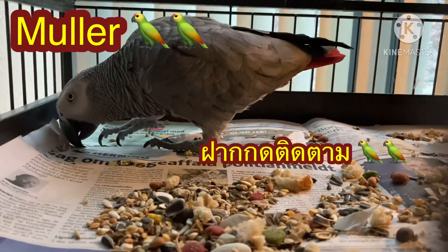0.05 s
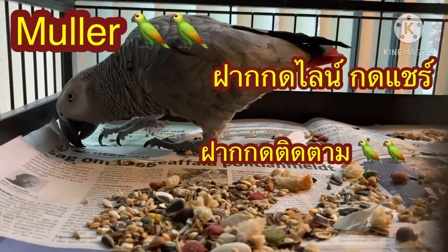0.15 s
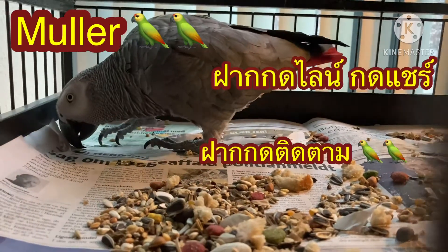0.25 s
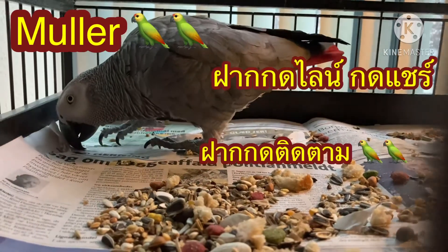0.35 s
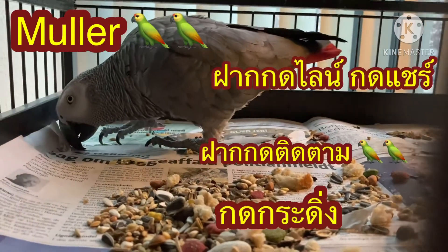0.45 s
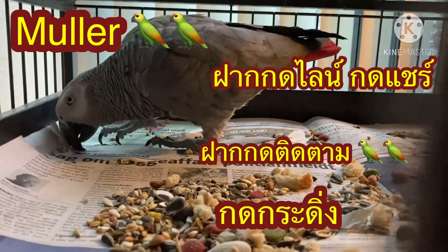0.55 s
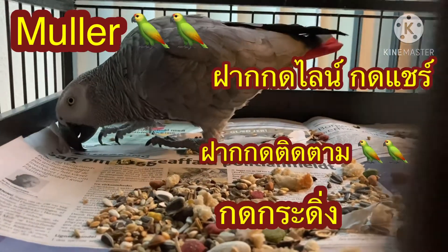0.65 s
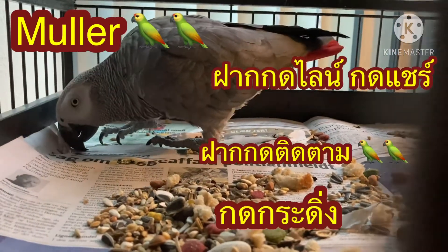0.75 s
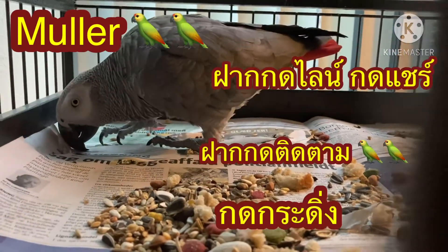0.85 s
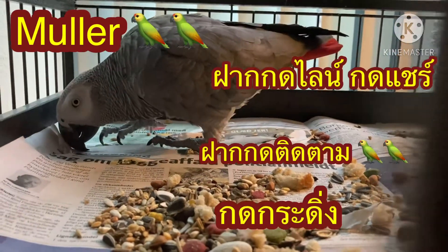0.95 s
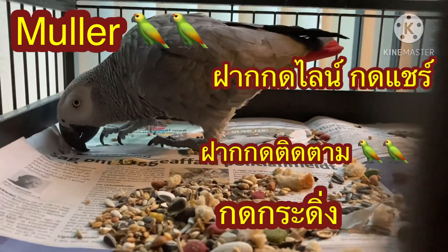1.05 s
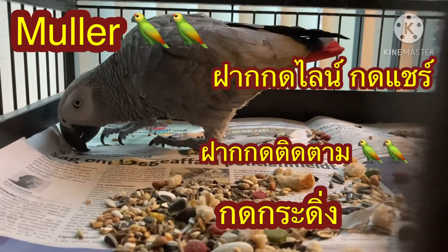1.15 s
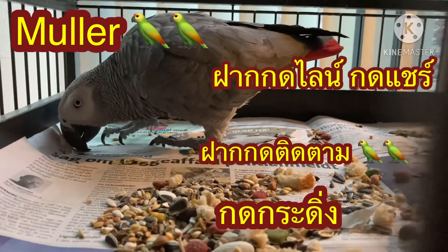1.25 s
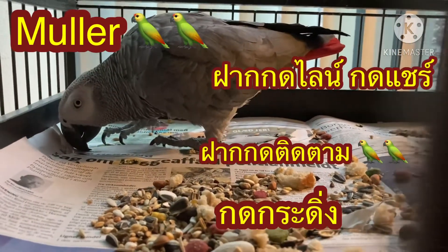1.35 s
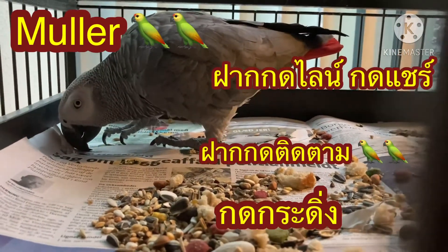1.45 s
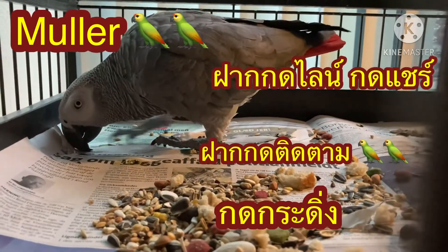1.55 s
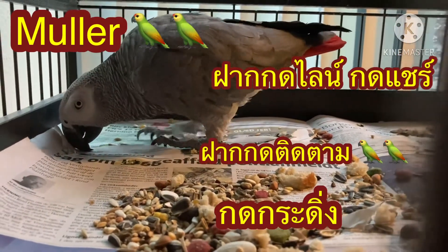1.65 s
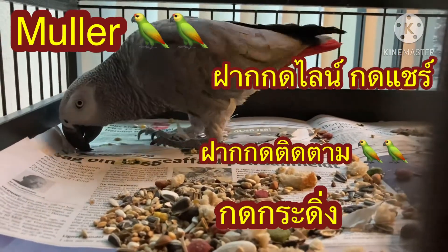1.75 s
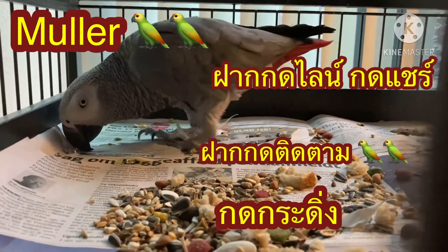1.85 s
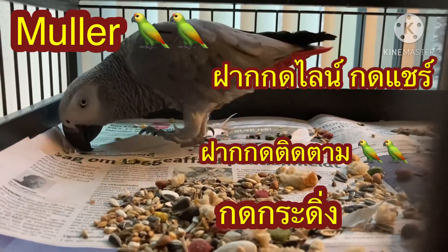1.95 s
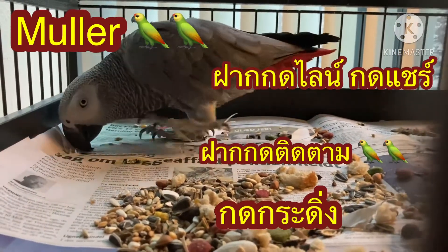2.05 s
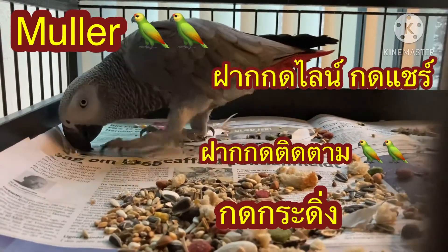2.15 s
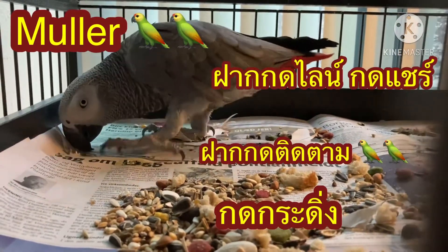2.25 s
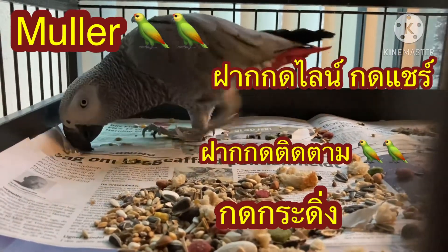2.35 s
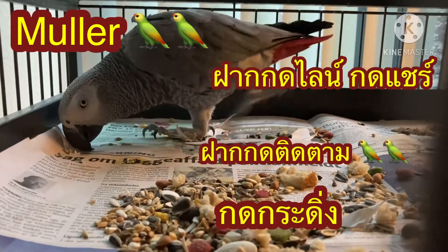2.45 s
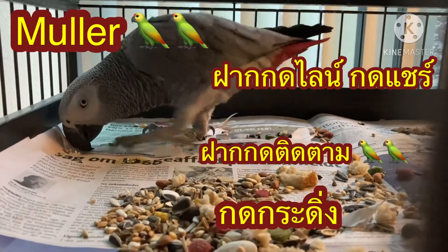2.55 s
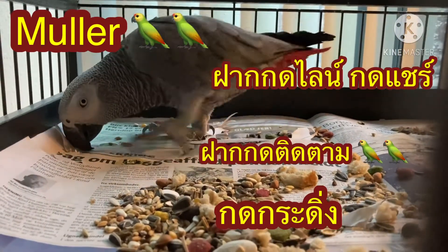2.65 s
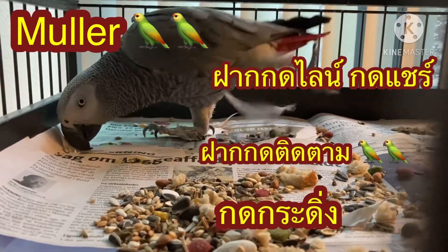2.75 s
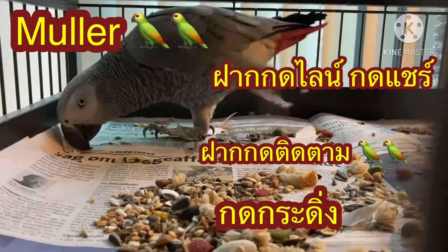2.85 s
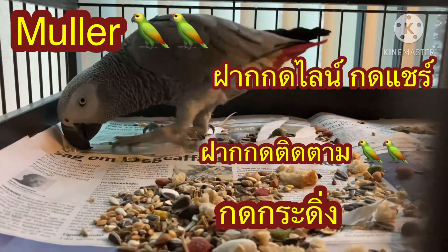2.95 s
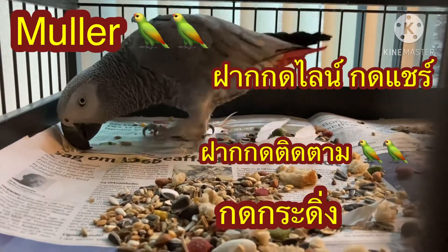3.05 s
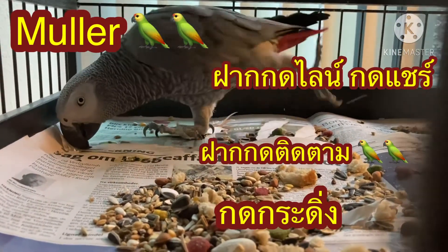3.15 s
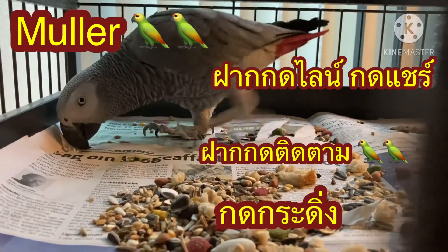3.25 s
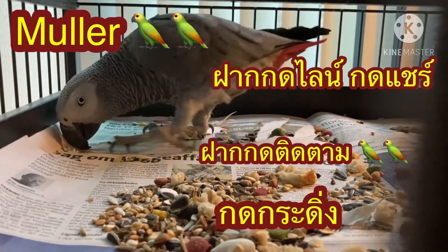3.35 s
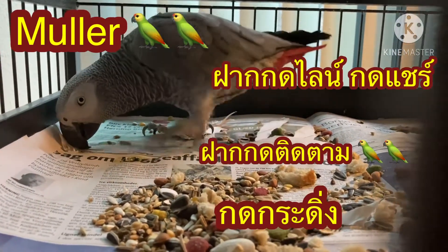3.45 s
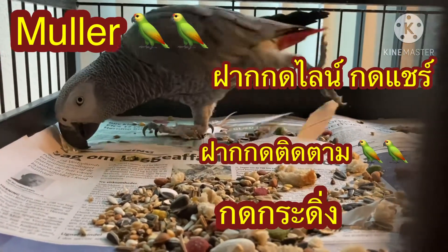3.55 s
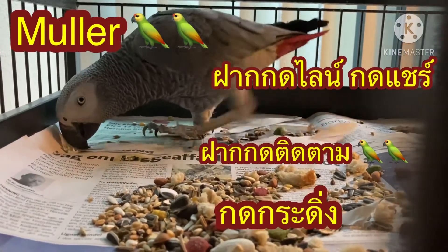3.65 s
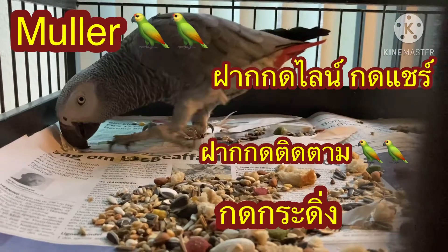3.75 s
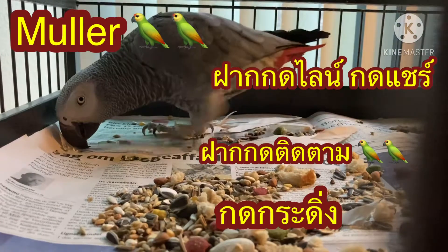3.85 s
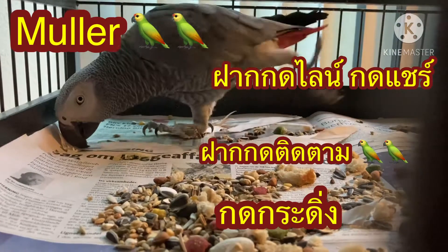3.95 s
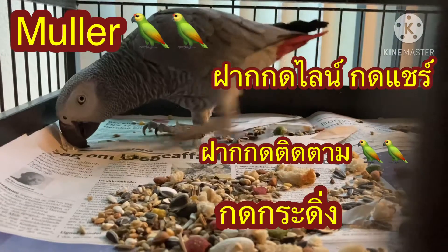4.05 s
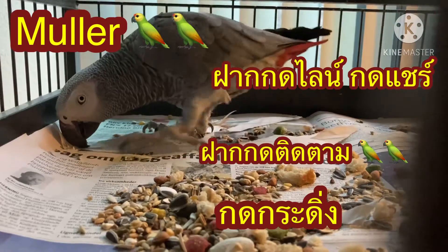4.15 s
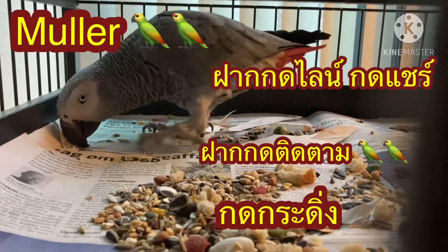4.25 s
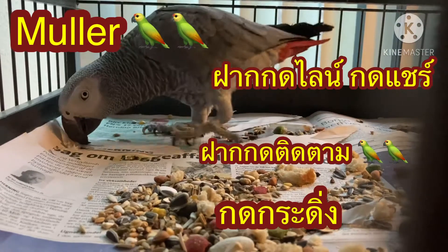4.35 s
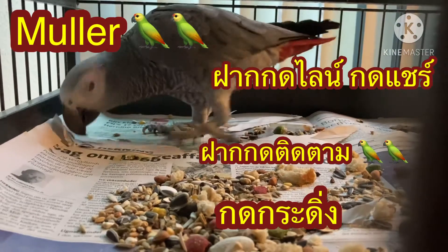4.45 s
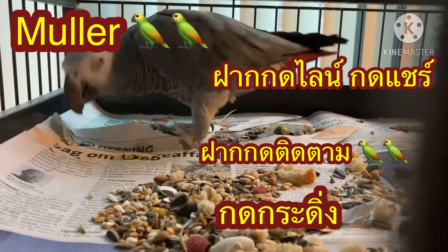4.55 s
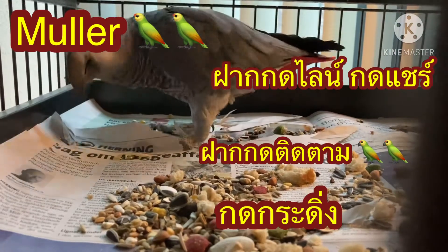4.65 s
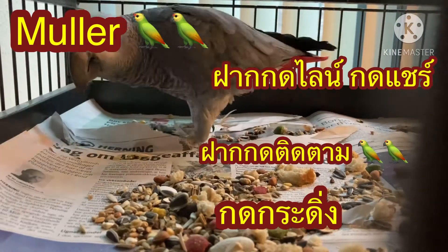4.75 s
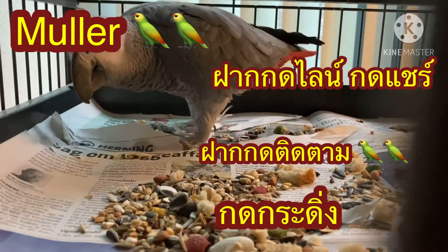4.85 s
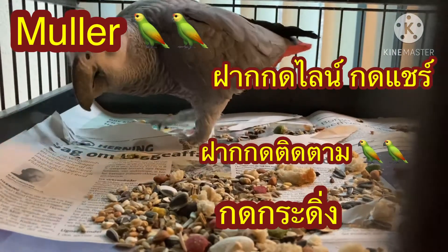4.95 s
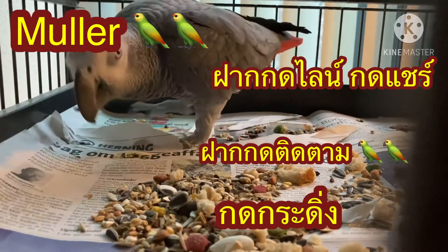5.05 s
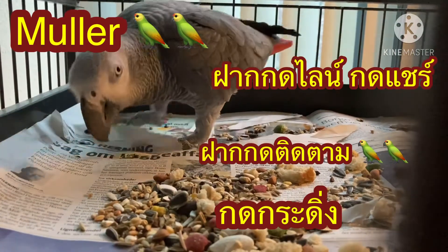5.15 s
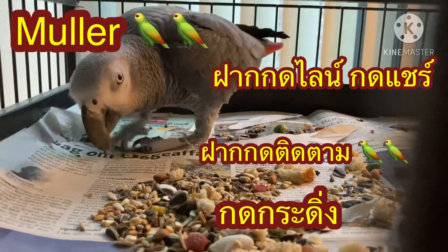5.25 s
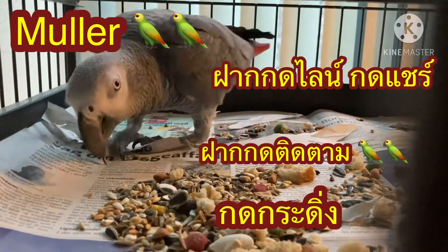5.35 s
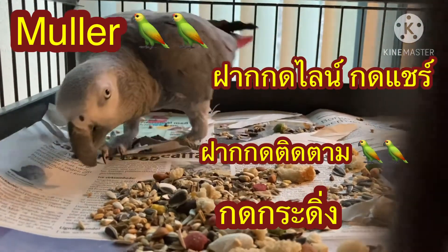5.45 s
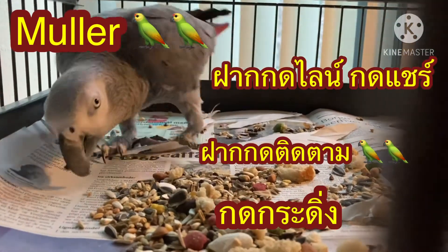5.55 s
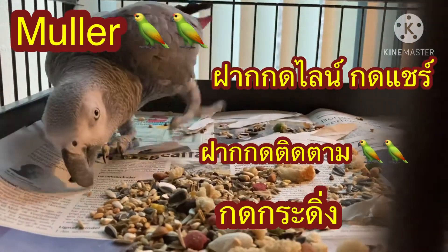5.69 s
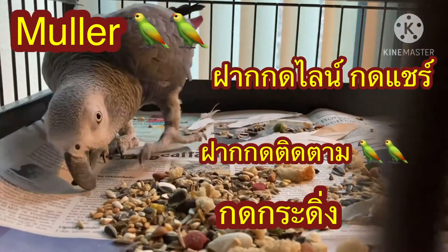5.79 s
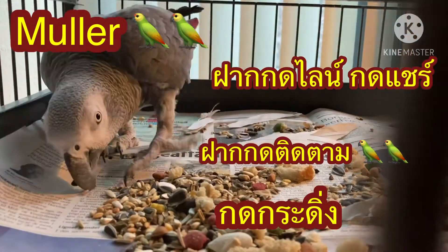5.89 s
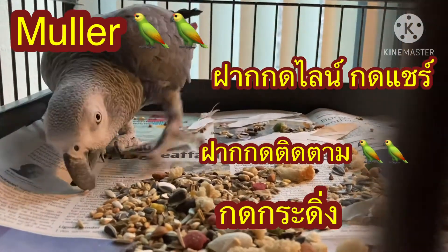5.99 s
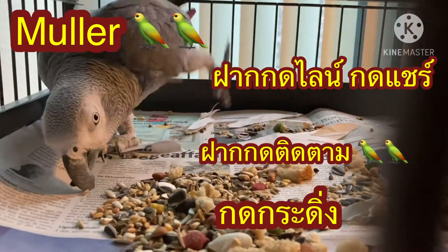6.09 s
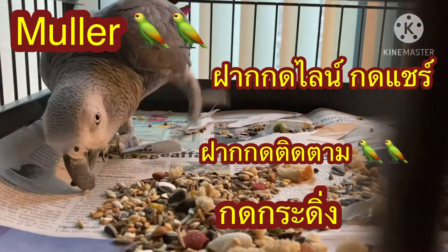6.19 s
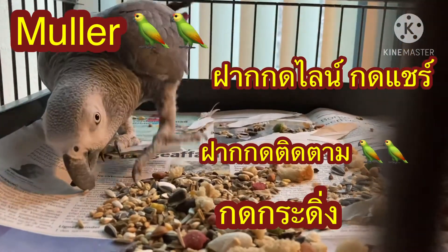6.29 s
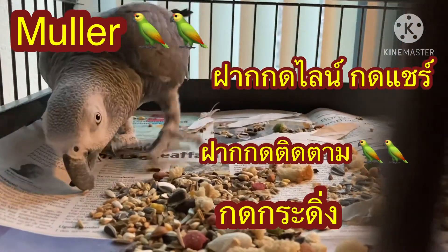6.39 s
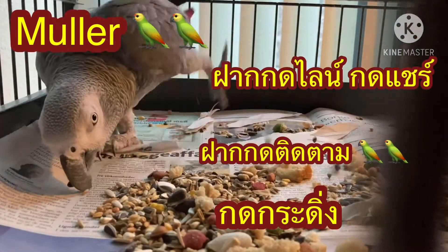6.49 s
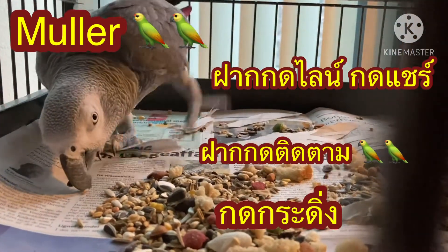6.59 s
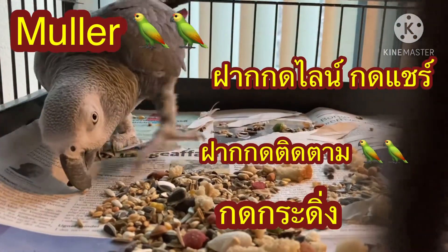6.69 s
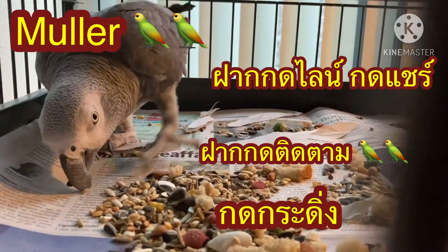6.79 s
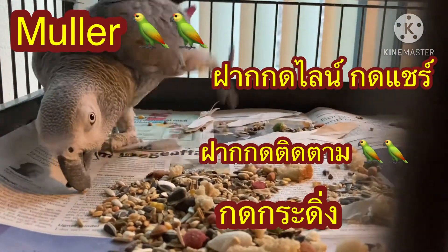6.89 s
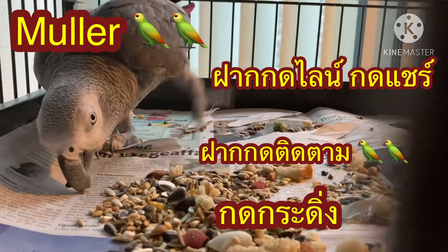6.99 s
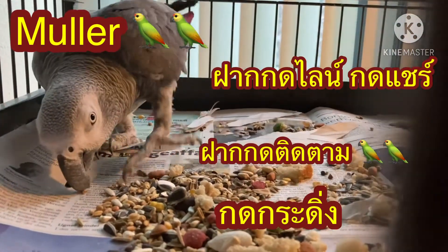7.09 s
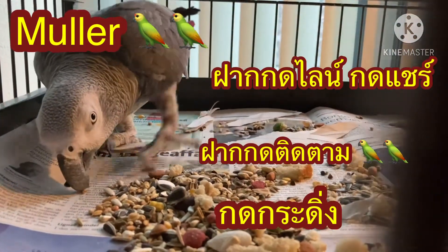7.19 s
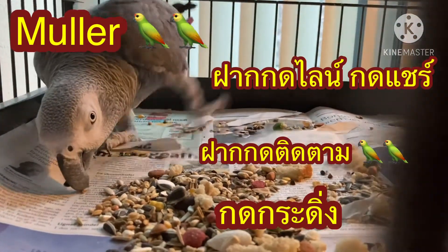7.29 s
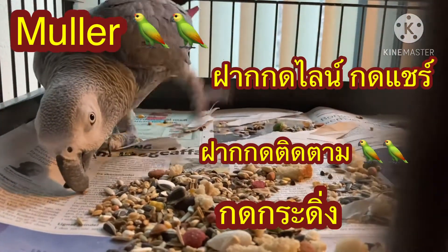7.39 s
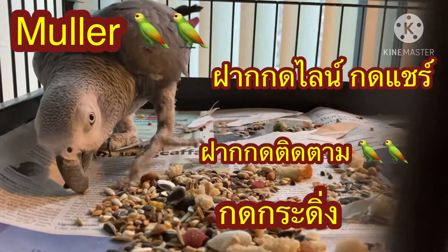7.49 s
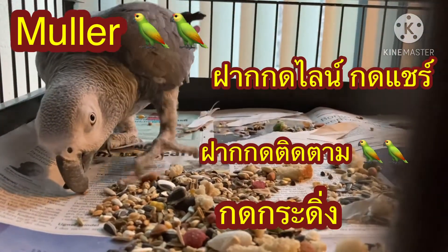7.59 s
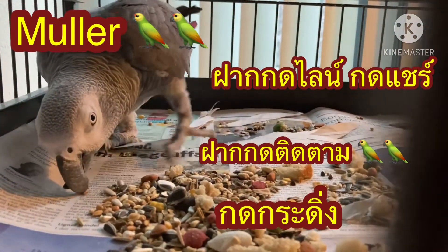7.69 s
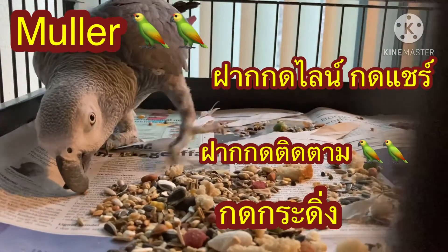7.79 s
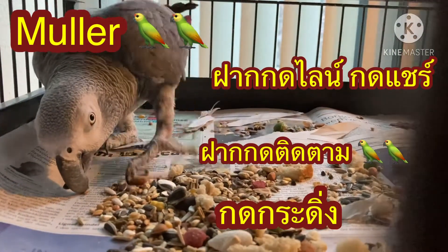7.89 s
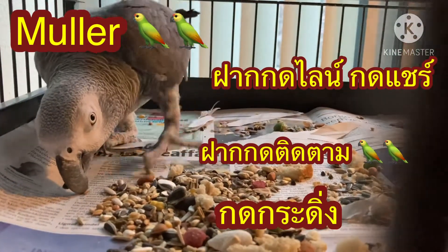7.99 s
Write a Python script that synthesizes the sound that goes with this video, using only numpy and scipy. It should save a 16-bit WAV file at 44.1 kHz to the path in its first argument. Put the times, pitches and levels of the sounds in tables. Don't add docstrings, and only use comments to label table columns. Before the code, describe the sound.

Dry claw strokes drag across newspaper on a hollow plastic tray, each rising slightly in pitch and ending in a sharp kick of rattling seeds. One hard seed hit stands out early. The first bout stops, small knocks and paper snaps fill the gap, then a brighter, more crackly bout resumes with low cage thumps. Close phone pickup, small room, short echoes and faint hiss.

```python
import sys
import numpy as np
from scipy import signal
from scipy.fft import rfft, irfft, next_fast_len
from scipy.io import wavfile
from scipy.ndimage import uniform_filter1d

SR = 44100
rng = np.random.default_rng(int(sys.argv[2]) if len(sys.argv) > 2 else 0)


def dump_mix(stems):
    frames = np.atleast_2d(stems).T
    limited = np.clip(frames, -1, 1)
    pcm = np.round(limited * 32767).astype(np.int16)
    wavfile.write(sys.argv[1], SR, pcm)


def rack_gain(trim_db):
    fader = np.asarray(trim_db, float)
    return 10 ** (fader / 20)


N = 354123
TRAY, SEEDS, PAPER, SHAKING = 1, 2, 3, 4


def evened(x):
    return x / np.sqrt(np.mean(x ** 2) + 1e-20)


def read(points, hz, axis=1):
    table = np.transpose(points)
    return np.interp(np.log(hz + 1), np.log(table[0] + 1), table[axis])


def body(colour, peaks=(), peak_db=0.):
    hz = abs(np.fft.fftfreq(8192, 1 / SR))
    lift = 0 * hz
    for f, width_hz, db in peaks:
        lift += rack_gain(db + peak_db) / (1 + (2 * (hz - f) / width_hz) ** 2)
    log_gain = np.log(rack_gain(read(colour, hz)) * (1 + lift))
    minimum_phase = -signal.hilbert(log_gain).imag
    taps = np.fft.ifft(np.exp(log_gain + 1j * minimum_phase)).real[:4096]
    return taps / np.linalg.norm(taps)


def ringing(drive, taps):
    return signal.oaconvolve(drive, taps[None], axes=1)[:, :N]


def band(x, hz, width_hz):
    b, a = signal.iirpeak(hz, hz / width_hz, SR)
    return evened(signal.lfilter(b, a, signal.lfilter(b, a, x)))


# frequency in Hz, level in dB per Hz.
FLOOR_COLOUR = [(12, -29), (20, -1.5), (65, 0), (241, -17), (1800, -27), (3000, -37), (5500, -42),
                (10000, -30), (16000, -50)]
FLOOR_DB = -72.5


def hush():
    return rack_gain(FLOOR_DB + 2.5) * ringing(rng.standard_normal((2, N)), body(FLOOR_COLOUR))


# start in seconds,
# peak in dB, pitch in Hz, t60 in seconds.
PUFFS = [(.025, -68, 3500, .04), (.192, -62, 3800, 0.028), (.222, -64, 2300, .08), (.277, -63, 2200, .03),
         (.465, -57, 7300, .02), (.556, -62, 7500, .02), (.603, -58, 2350, .3), (.82, -62, 1100, .1),
         (2.281, -17, 1080, .22), (2.641, -38, 3900, .05), (2.655, -34, 7000, .04), (2.655, -28, 2300, .1),
         (2.698, -36, 900, .06), (2.76, -30, 4550, 0.092), (2.76, -38, 7350, .05), (2.784, -33, 2500, .02),
         (2.789, -38, 2000, .03), (2.876, -40, 2100, .03), (3.415, -37, 4000, .06),
         (3.425, -28, 2100, 0.065), (3.442, -33, 5800, .03), (3.811, -35, 3800, .05),
         (3.823, -25, 2250, .2), (3.823, -28, 4000, .06), (4.419, -34.5, 7000, 0.068),
         (4.419, -34.5, 10800, 0.069), (4.78, -56, 1400, .1), (4.872, -44, 700, .04),
         (5.566, -50, 3210, .02), (5.703, -40, 1640, 0.035), (5.722, -42, 1550, 0.045),
         (5.724, -45.5, 750, .05), (5.862, -42, 500, .03), (6.34, -28, 7800, .02),
         (6.352, -20, 6900, 0.029), (6.375, -24, 2080, 0.055), (6.454, -33, 7200, .015),
         (6.795, -29, 2150, 0.16), (6.865, -37, 7000, 0.033), (7.155, -22, 6800, 0.022),
         (7.166, -23, 6760, .025), (7.203, -29, 2150, .1), (7.254, -20, 4240, .06), (7.254, -24, 7200, .04),
         (7.254, -28, 1130, 0.071), (7.264, -26, 3500, .04), (7.428, -46, 3800, .02),
         (2.547, -40, 900, .15), (3.394, -32, 450, .06), (3.8, -30, 600, .06), (6.34, -30, 780, .08),
        (6.725, -33, 800, .1), (6.678, -44, 4500, .03), (6.262, -48, 6500, .03), (2.94, -36, 910, .1),
        (3.338, -42, 1000, .1), (3.735, -41, 1000, .1), (4.2, -34, 1150, 0.17), (4.254, -27, 1200, .08),
        (4.423, -29, 1096, .1), (5.915, -32, 1350, .1), (6.229, -34, 1110, 0.086), (6.643, -45, 900, 0.066),
        (6.98, -44, 500, .08), (7.027, -37.5, 1150, .18), (7.1, -35, 1400, .12), (7.441, -40, 900, .12),
        (7.495, -39, 1200, .12), (7.495, -44, 2200, .08), (7.575, -35, 1450, .2), (7.607, -26, 1090, 0.16),
        (7.625, -29, 1200, .15), (7.885, -33, 1300, 0.17), (7.955, -31, 950, .12), (2.656, -30, 11100, .05),
        (6.352, -26, 11000, .03), (7.155, -24, 10900, .03), (7.165, -28, 11000, 0.028),
        (7.254, -22, 11000, .06), (5.918, -36.5, 7200, .06), (5.953, -30, 7000, 0.028),
        (5.965, -28, 4200, .04), (5.984, -26, 3800, 0.088), (6.753, -27, 4000, .03),
        (6.779, -25, 4300, 0.065), (6.836, -38, 4500, .02), (7.577, -41, 4500, .02)]
HUSK_WIDTH, HUSK_RISE_S = .22, .0015


def husks():
    out, t = np.zeros((2, N + SR)), np.arange(SR // 8) / SR
    rise = np.minimum(t / HUSK_RISE_S, 1)
    for s, db, hz, t60 in PUFFS:
        ring = band(rng.standard_normal((2, len(t))), hz, HUSK_WIDTH * hz)
        out[:, round(s * SR):][:, :len(t)] += rack_gain(db - 5 - 60 * t / t60) * ring * rise
    return out[:, :N]


# start in seconds, tray level in dB, seeds level in dB, paper level in dB.
TICKS = [(.048, -85, -64, -68), (.163, -73, -65, -66), (.329, -75, -66, -66), (.572, -75, -64, -56),
         (.735, -75, -65, -66), (.112, -87, -63, -67.5), (.182, -64, -51, -62), (.447, -76, -61, -63),
         (.601, -76, -49, -46), (.72, -69, -57, -60), (.812, -66, -79, -58), (1.068, -85, -71, -65),
         (1.212, -59, -62, -54), (1.32, -70, -79, -71), (1.581, -65, -75, -54.5)]
CRACKS = [(2.236, -76, -38, -43), (4.017, -51, -32, -37), (4.4, -60, -60, -43.5), (3.998, -60, -49, -42.5),
          (3.252, -55, -49, -47.5), (5.328, -60, -57, -42), (5.825, -53, -55, -57), (7.742, -60, -52, -45),
          (7.908, -36, -45, -50), (5.055, -60, -52, -48), (5.064, -42, -39, -44),
          (5.192, -39, -26.5, -31.5), (5.22, -43, -33, -31.5), (5.353, -46, -55, -28),
          (6.194, -66.5, -61, -44), (6.754, -43, -44.5, -23), (7.166, -32, -39, -31.5),
          (2.784, -39, -28.5, -36), (7.51, -70, -60, -41.5), (7.676, -46, -59, -65),
          (7.71, -59, -53, -41.5), (6.352, -28, -31, -27.5), (7.155, -31, -29.5, -29),
          (6.505, -59, -58, -45.5), (6.79, -40, -24.5, -29), (7.194, -23, -26, -35.5)]
SNAPS = [(1.782, -64, -69, -43.5), (1.919, -40.5, -58, -36.5), (2.165, -37.5, -36, -39),
         (2.489, -48, -44.5, -42.5), (2.547, -59, -43.5, -45), (2.939, -36.5, -33.5, -40),
         (3.016, -46, -26, -47.5), (3.039, -45, -24, -29.5), (3.115, -66, -61, -37),
         (3.656, -64, -33.5, -45), (3.959, -53, -54, -48), (4.083, -29.5, -32, -42),
         (4.506, -39.5, -39, -55), (5.101, -32.5, -26.5, -34.5), (5.232, -49, -52, -34),
         (5.703, -50, -52, -38), (5.859, -45.5, -66, -53), (5.984, -33, -22.5, -38),
         (6.374, -22.5, -25, -28), (6.455, -67, -58, -38), (6.677, -48, -51, -42.5),
         (6.763, -31, -36.5, -43), (6.836, -59, -49, -33.5), (7.372, -64, -65, -40.5),
         (7.608, -32.5, -40, -48), (6.779, -22.5, -28, -22.5), (7.182, -28, -28.5, -27),
         (3.826, -43.5, -20, -37)]
BURSTS = [
    (2.089, -67, -45.5, -46.5),
    (2.281, -21, -12.5, -46),
    (4.254, -29, -46, -58),
    (2.76, -65, -30, -37),
    (2.875, -53, -42, -48),
    (3.441, -34.5, -30, -34.5),
    (5.95, -50, -59, -31),
    (5.963, -52, -47, -31),
    (7.254, -66, -30, -24.5),
    (7.765, -42.5, -65, -40.5),
]
TICK_T60_S, CRACK_T60_S, SNAP_T60_S, BURST_T60_S = 0.063, 0.041, 0.043, 0.15


def snaps(layer, ring, crack):
    out, t = np.zeros(N + SR), np.arange(SR // 5) / SR
    kinds = [(TICKS, TICK_T60_S), (CRACKS, CRACK_T60_S), (SNAPS, SNAP_T60_S), (BURSTS, BURST_T60_S)]
    for rows, t60 in kinds:
        burst = rack_gain(-60 * t / (ring * t60))
        shape = (burst + crack * np.exp(-t / 0.0011)) * np.minimum(t / 0.00032, 1)
        for row in rows:
            out[round(row[0] * SR):][:len(t)] += rack_gain(row[layer]) * shape
    return out[:N] * rng.standard_normal((2, N))


def slips(per_s, spread_db, grain_s, width_hz, smooth, clump_db):
    frames, hz, step_s = N // 32 + 5, np.fft.rfftfreq(128, 1 / SR), 32 / SR
    size = rack_gain(spread_db * np.minimum(rng.exponential(1, (frames, len(hz))), 2.7))
    size = size * (rng.random(size.shape) < per_s * step_s / len(hz))
    apart_hz = hz[:, None] - hz
    shape = size @ np.exp(-(apart_hz / width_hz) ** 2)
    shape = signal.lfilter([1], [1, -np.exp(-step_s / grain_s)], shape, axis=0)
    clumps = rng.standard_normal(size.shape) @ np.exp(-(apart_hz / (2 * width_hz)) ** 2)
    clumps = evened(uniform_filter1d(uniform_filter1d(clumps, size=20, axis=0), size=12, axis=0))
    noise = rng.standard_normal((2, frames * 32))
    z = signal.stft(noise, nperseg=128, noverlap=96)[2][..., :frames]
    field = (evened(shape) + smooth) * rack_gain(clump_db * clumps)
    return evened(signal.istft(z * field.T, nperseg=128, noverlap=96)[1][:, :N])


def bumps(t, rows, rise_s=0., rise=0.):
    fade_db, gain = -25.5, 0 * t
    for s, db, length in rows:
        away = np.maximum((s - t) / (rise_s + rise * length), (t - s) / length)
        gain += rack_gain(db + fade_db * away)
    return gain


# landing in seconds,
# kick in seconds, then the drag's level in dB on the tray, among the seeds and on the paper.
RAKES = [(1.787, 1.832, -47, -59.5, -49), (2.11, 2.269, -46, -46.5, -46.5), (2.54, 2.67, -37, -37, -44),
         (2.935, 3.046, -35.5, -33, -42), (3.338, 3.443, -34.5, -33, -43.5),
         (3.732, 3.828, -31, -27.5, -49), (4.174, 4.28, -41, -49, -63.5), (4.384, 4.454, -41, -49, -62),
         (5.856, 5.984, -33, -29.5, -40.5), (6.25, 6.368, -30.5, -28.5, -38),
         (6.65, 6.791, -31, -28, -38.5), (7.059, 7.184, -33.5, -31, -41), (7.49, 7.633, -36.5, -47, -51),
         (7.875, 7.978, -34.5, -43.5, -48.5)]
# level at landing in dB, time before the kick at full strength
# in seconds, fall in dB per second, build (1 = even rise in dB).
FOLLOW = [
    (-50.5, 0.047, 227.5, 1),
    (-54, 0.0083, 198.5, 2),
    (-61.5, 0.042, 144, 1.3),
    (-59, 0, 104, 1.5),
]
# peak in seconds, tray level in dB, seeds level in dB, paper level in
# dB, length in seconds.
RUSTLES = [(0.189, -59, -58.5, -62, 0.33), (0.833, -59.5, -61, -67, 0.024), (1.233, -61, -68, -66, 0.031),
           (1.493, -58.5, -65, -60.5, 0.17), (0.467, -86, -66.5, -69, 0.13),
           (1.594, -57, -78.5, -58.5, 0.24), (2.286, -26, -28, -63, 0.18), (3.665, -55, -55.5, -47, .08),
           (1.953, -45.5, -40.5, -42, 0.035), (2.769, -46.5, -41.5, -47, 0.2), (3.266, -44, -47, -45, 0.06),
           (4.018, -42.5, -45, -43, 0.3), (5.092, -59, -57, -55, 0.41), (5.72, -49.5, -57, -47, 0.14),
           (7.263, -50, -32, -42, 0.072), (7.748, -52, -55, -54, 0.28)]
# peak in seconds, tray level in dB, seeds level in dB, paper level in dB, length in seconds.
SWELLS = [(0.617, -62.5, -55, -55.5, 0.15), (1.745, -55.5, -56, -62.5, 0.41), (4.775, -56, -68, -88, 0.12),
          (4.68, -63, -86, -106, 0.17), (4.86, -56, -74, -68, 0.11), (5.189, -46, -46.5, -44, 0.18),
          (5.325, -51.5, -60, -57, .13), (5.542, -91, -63.5, -42.5, 0.068), (7.41, -55, -52, -48.5, 0.465),
          (2.66, -32.5, -31.5, -36, .045), (4.445, -39, -47, -45, .05), (3.828, -40, -31.5, -43, 0.032),
          (2.6, -59.5, -51.5, -46, 0.031), (3.652, -59, -52, -46.5, .02), (5.56, -66, -55, -55, .05),
          (0.347, -68, -68, -70, 0.044), (8.03, -43.5, -63, -58.5, 0.21)]
# peak in seconds, level in dB, length in seconds.
JOLTS = [(0.184, -66, .06), (1.711, -57.5, 0.046), (1.933, -59, 0.042), (2.091, -70.5, .05),
         (2.312, -48.5, 0.066), (2.638, -51, 0.05), (2.776, -46.5, 0.049), (3.01, -43, .06),
         (3.399, -45, 0.025), (3.781, -43, 0.06), (4.017, -40.5, 0.053), (4.435, -46.5, 0.07),
         (5.217, -48.5, 0.079), (5.983, -29.5, 0.058), (6.229, -51, .06), (6.377, -39.5, 0.096),
         (6.79, -35, 0.12), (7.036, -52, 0.082), (7.176, -44, .06), (7.786, -49, 0.12), (7.982, -48, 0.18)]
REST_DB = [
    -94,
    -100,
    -96,
    -81.5,
]
# its level in dB, and its share of the fall speed.
TAIL_DB = [
    -10,
    -8.5,
    -5,
    -9,
]
TAIL_PACE = [
    0.41,
    0.62,
    0.63,
    0.33,
]
RUSTLE_RISE_S, SWELL_RISE, JOLT_RISE = 0.032, 0.58, .3
LANDING_S, SHAKE_UNDER_DRAG_DB, SHAKE_SHARE = .011, -34.5, 0.6


def effort(layer):
    t = np.arange(0, N / SR + .01, .002)
    land_db, lead_s, fall_db, build = FOLLOW[layer - 1]
    gain = rack_gain(REST_DB[layer - 1]) + 0 * t
    for land, kick, *dbs in RAKES:
        top_db = SHAKE_UNDER_DRAG_DB + SHAKE_SHARE * dbs[0] if layer == SHAKING else dbs[layer - 1]
        way = np.clip((t - land) / max(kick - lead_s - land, LANDING_S), 0, 1) ** build
        drag = rack_gain(land_db + (top_db - land_db) * way)
        fall = fall_db * np.maximum(t - kick, 0)
        tail = rack_gain(TAIL_DB[layer - 1] - TAIL_PACE[layer - 1] * fall)
        touch = np.clip((t - land) / LANDING_S + 1, 0, 1)
        gain += drag * np.maximum(rack_gain(-fall), tail) * touch
    if layer == SHAKING:
        gain += bumps(t, JOLTS, rise=JOLT_RISE)
    else:
        gain += bumps(t, np.array(RUSTLES)[:, [0, layer, -1]], rise_s=RUSTLE_RISE_S)
        gain += bumps(t, np.array(SWELLS)[:, [0, layer, -1]], rise=SWELL_RISE)
    return np.interp(np.arange(N) / SR, t, gain)


# frequency in Hz, width in Hz, level in dB.
SEED_MODES = [(1710, 84, 2), (1873, 35, -1), (2067, 60, 5), (2300, 60, 1), (3242, 42, -1), (3827, 62, 1),
              (4700, 60, -4)]
# frequency in Hz, level in dB.
SEED_COLOUR = [(900, -53), (1500, -3.5), (2300, 3), (2900, -1.5), (4600, -3.5), (5400, -16), (7500, -29)]


def seeds():
    rattle = slips(per_s=2000, spread_db=4.9, grain_s=0.0019, width_hz=950, smooth=1.0, clump_db=1.5)
    drive = rack_gain(-2.5) * effort(SEEDS) * rattle + rack_gain(-3.5) * snaps(SEEDS, ring=0.55, crack=0.28)
    return ringing(drive, body(SEED_COLOUR, SEED_MODES, peak_db=-3.0))


# frequency in Hz, level in dB.
PAPER_COLOUR = [(2500, -8.5), (5500, -6), (7000, 2.5), (10000, 2), (12500, -3), (15750, -5.5), (16000, -31),
                (17000, -72)]


def paper():
    fizz = slips(per_s=500, spread_db=5., grain_s=.0008, width_hz=2500, smooth=1.7, clump_db=1.8)
    drive = rack_gain(-1.5) * effort(PAPER) * fizz + rack_gain(1.0) * snaps(PAPER, ring=.6, crack=0.66)
    return ringing(drive, body(PAPER_COLOUR))


def scrape_hz():
    landing_hz, kick_hz, free_hz, free_s = 780, 1055, 810, 0.12
    times = (np.array(RAKES)[:, [0, 1, 1]] + [0, 0, free_s]).ravel()
    return np.interp(np.arange(N) / SR, times, np.tile([landing_hz, kick_hz, free_hz], len(RAKES)))


def resonate(x, hz, width_hz):
    turn = np.exp(2j * np.pi * np.cumsum(hz) / SR)
    r = np.exp(-np.pi * width_hz / SR)
    return 2 * (turn * signal.lfilter([1 - r], [1, -r], x / turn)).real


# frequency in Hz, width in Hz, level in dB.
TRAY_MODES = [(417, 20, -3), (737.6, 12, 0), (990, 20, -1), (1138, 25, 6), (1338, 25, 3), (1500, 30, 7)]
# frequency in Hz, level in dB.
TRAY_COLOUR = [(150, -33), (320, -1.5), (900, -3.5), (1400, 3), (1900, 7), (3000, -28)]
BARE_FOCUS, SEED_COVER = 0.74, 1.5


def tray():
    rub = slips(per_s=4000, spread_db=3.8, grain_s=.002, width_hz=500, smooth=.9, clump_db=1.8)
    pitch = scrape_hz()
    focus = evened(resonate(resonate(rub, pitch, 800), pitch, 800))
    drag = effort(TRAY)
    bare = BARE_FOCUS * drag / (drag + SEED_COVER * effort(SEEDS))
    scrape = drag * ((1.1 - bare) * rub + (0.027 + bare) * focus)
    drive = rack_gain(-6.0) * scrape + rack_gain(-4.0) * snaps(TRAY, ring=1.21, crack=0.53)
    return ringing(drive, body(TRAY_COLOUR, TRAY_MODES, peak_db=-4.5))


# frequency in Hz, width in Hz, level in dB.
SHAKE_MODES = [(250, 40, 0), (286, 35, 1)]
# frequency in Hz, level in dB.
SHAKE_COLOUR = [(20, -37), (60, -4.5), (120, -9.5), (200, -9), (290, -6), (400, -28.5), (800, -24)]


def shaking():
    wobble = slips(per_s=1700, spread_db=3.5, grain_s=0.009, width_hz=500, smooth=1.2, clump_db=1.4)
    drive = effort(SHAKING) * wobble + rack_gain(-26) * snaps(TRAY, ring=0.77, crack=.1)
    return ringing(drive, body(SHAKE_COLOUR, SHAKE_MODES, peak_db=3.))


# start in seconds, peak in dB, pitch in Hz, t60 in seconds.
KNOCKS = [(1.485, -55, 1080, 0.026), (4.133, -33, 759, 0.022), (3.7, -47.5, 617, .06),
          (4.835, -51, 505, 0.041), (5.063, -46, 840, 0.042), (5.1, -27, 645, 0.022),
          (5.191, -19.5, 845, 0.015), (5.702, -50, 1626, 0.0085), (6.229, -32, 560, 0.035),
          (6.642, -45.5, 563, 0.058), (7.026, -35, 450, 0.06), (7.396, -44.5, 556, 0.049),
          (7.449, -45, 650, 0.11)]
# start in seconds, peak in dB, pitch in Hz, length in seconds.
THUMPS = [
    (0.56, -62, 73.1, 0.17),
    (1.494, -70, 47.4, 0.13),
    (3.041, -57.5, 41.7, 0.12),
    (3.825, -57, 41.2, 0.17),
    (5.19, -46, 118, 0.025),
    (5.68, -56.5, 150.5, 0.023),
    (6.382, -48, 86.2, 0.083),
    (6.777, -45, 70, 0.036),
    (7.084, -55, 51.3, .2),
    (7.188, -50.5, 110, .06),
]


def knocks():
    out, t = np.zeros(N + SR), np.arange(SR // 10) / SR
    for s, db, hz, t60 in KNOCKS:
        ring = sum(np.sin(2 * np.pi * hz * k * t) * g for k, g in [(.72, 0.22), (1, 1), (1.45, .45)])
        out[round(s * SR):][:len(t)] += rack_gain(db - 60 * t / t60) * ring * np.minimum(t / .001, 1)
    for s, db, hz, length in THUMPS:
        u = np.arange(round(3 * length * SR)) / SR
        age = u / length * 3
        swing = np.sin(2 * np.pi * hz * u) * (age * np.exp(1 - age)) ** 2
        out[round(s * SR):][:len(u)] += rack_gain(db) * swing
    return out[:N]


def wires():
    under_seeds_db, t60_s = -14, .45
    t = np.arange(0, N / SR, .002)
    gain = 0 * t
    for _, kick, _, seeds_db, _ in RAKES:
        gain += rack_gain(seeds_db + under_seeds_db - 60 * (t - kick) / t60_s) * (t > kick)
    buzz = band(rng.standard_normal((2, N)), hz=2200, width_hz=620)
    return np.interp(np.arange(N) / SR, t, gain) * buzz


# frequency in Hz, t60 in seconds.
ROOM = [(100, 0.34), (1000, 0.11), (4000, 0.1), (12000, 0.05)]


def room(x):
    taps = rng.choice([-1., 1.], (2, SR // 2)) * (rng.random((2, SR // 2)) < .05)
    taps[:, :150] = 0
    hz, t, z = signal.stft(taps, SR, nperseg=256)
    tail = signal.istft(z * rack_gain(-60 * t / read(ROOM, hz)[:, None]), SR, nperseg=256)[1]
    return signal.fftconvolve(x, tail / np.linalg.norm(tail[0]), axes=1)[:, :N]


# frequency in Hz, likeness from 0 to 1, left minus right in dB.
PORTS = [(30, 0.86, 0.7), (275.5, 0.98, 0), (694, 0.48, 3.5), (1340, 0.15, 2.5), (3180, 0.27, 3),
         (6040, 0, 2.5), (6700, 0.82, 0), (16200, 0.65, 0)]
BASS_LAG_S, TREBLE_LEAD_S, TURN_HZ = 0.00022, 0.0002194, 3700


def ports(views):
    size = next_fast_len(N + 512)
    hz, (a, b) = np.fft.rfftfreq(size, 1 / SR), rfft(views, size)
    late, early = -2 * np.pi * hz * BASS_LAG_S, np.pi + 2 * np.pi * hz * TREBLE_LEAD_S
    phase = np.where(hz < TURN_HZ, late, early)
    same = np.clip(read(PORTS, hz), 0, 1)
    tilt = rack_gain(read(PORTS, hz, axis=2) / 2)
    right = same * np.exp(1j * phase) * a + np.sqrt(1 - same ** 2) * b
    return irfft(np.array([a * tilt, right / tilt]), size)[:, :N]


def scene():
    near = rack_gain(-1.5) * (tray() + seeds() + paper()) + shaking() + knocks() + husks() + wires()
    return ports(near + rack_gain(-10.0) * room(near) + hush())


def joint_stereo(x, weak_db=4.5, from_hz=5000, side_top_hz=15100):
    mid_side = np.array([x[0] + x[1], x[0] - x[1]]) / 2
    hz, t, z = signal.stft(mid_side, SR, nperseg=2048, noverlap=1536)
    bands = uniform_filter1d(uniform_filter1d(abs(z) ** 2, size=16, axis=1), size=3, axis=2)
    power = np.repeat(bands[:, 8::16], 16, axis=1)[:, np.minimum(np.arange(1025), 1023)]
    weak = (power < power[::-1] * rack_gain(-2 * weak_db)) & (hz > from_hz)[:, None]
    weak[1, hz > side_top_hz] = True
    total = power[:, hz > from_hz].sum((0, 1))
    steady = total < 3.5 * np.roll(total, 2)
    gain = np.where(weak & steady, .002, 1)
    mid, side = signal.istft(z * gain, SR, nperseg=2048, noverlap=1536)[1][:, :N]
    return np.array([mid + side, mid - side])


def low_pass(x):
    return signal.sosfilt(signal.butter(12, 16990, fs=SR, output="sos"), x)


def record(dry):
    edge = signal.firwin(255, 16400, window=("kaiser", 9), fs=SR)
    limited = signal.oaconvolve(dry, edge[None], "same", axes=1)
    mix = joint_stereo(limited)
    return low_pass(mix)


dry = scene()
out = record(dry)
dump_mix(out)
```